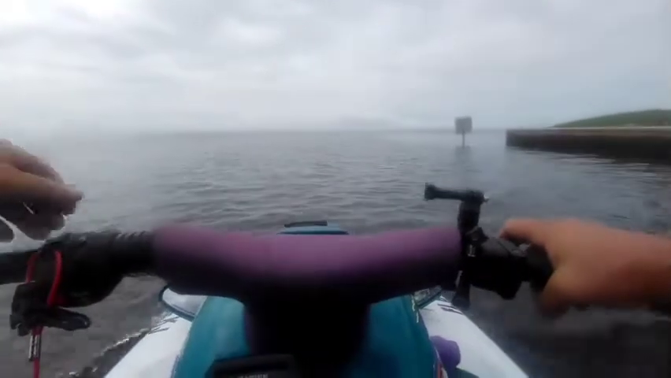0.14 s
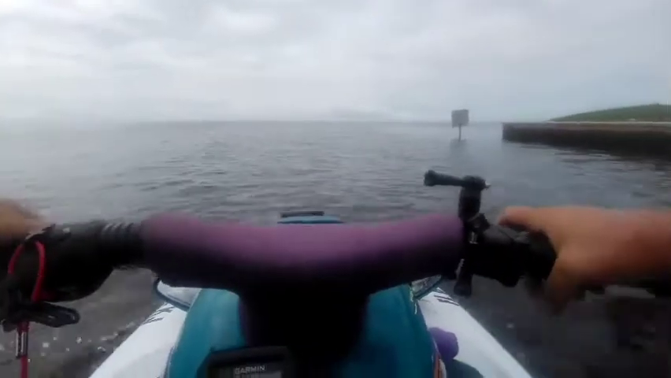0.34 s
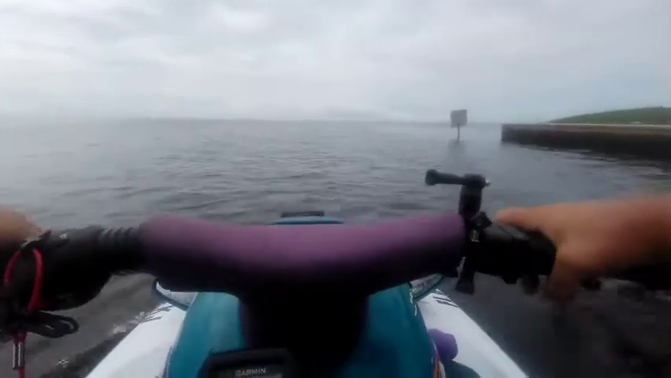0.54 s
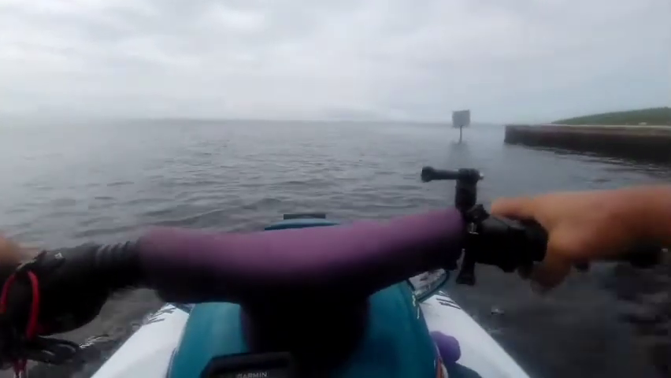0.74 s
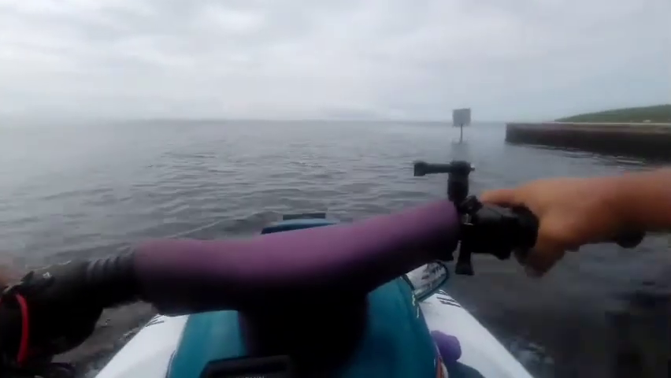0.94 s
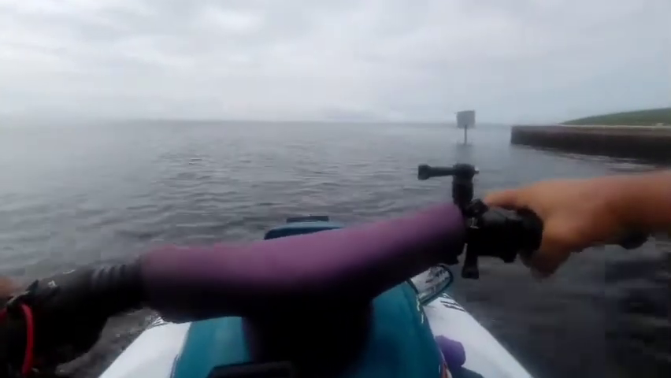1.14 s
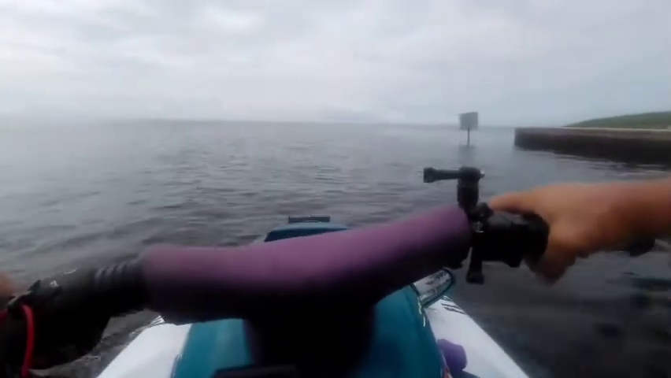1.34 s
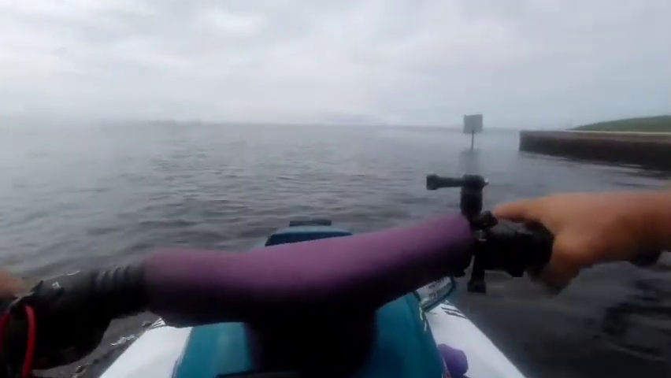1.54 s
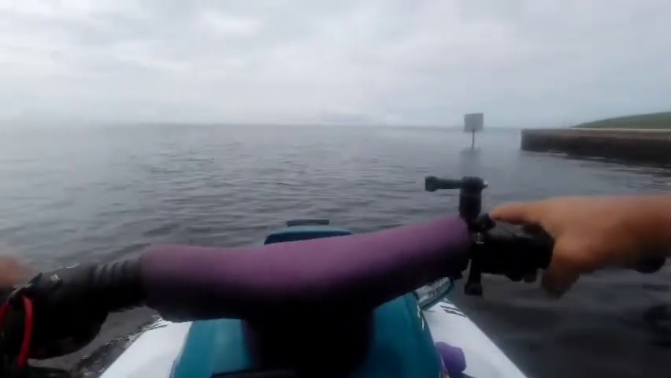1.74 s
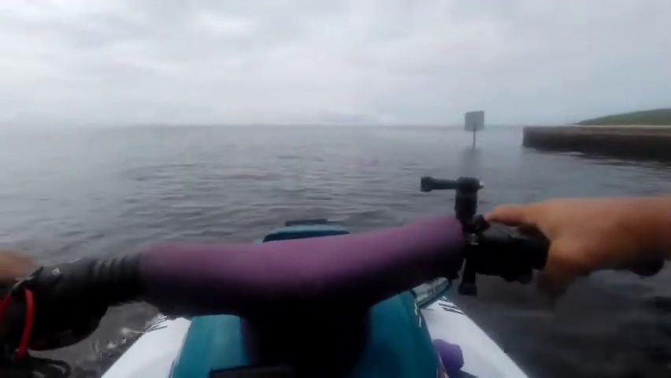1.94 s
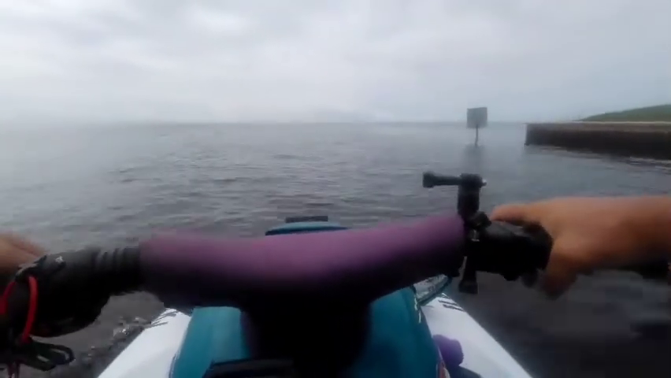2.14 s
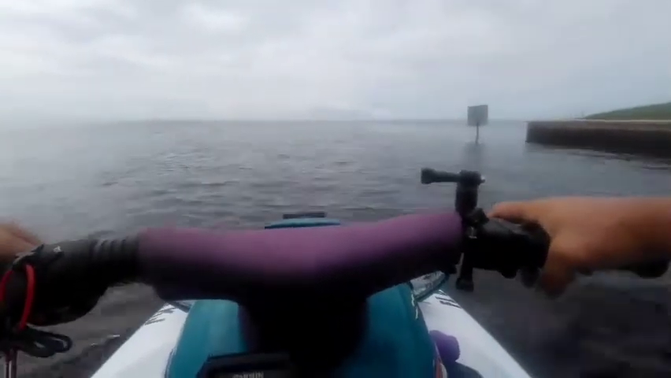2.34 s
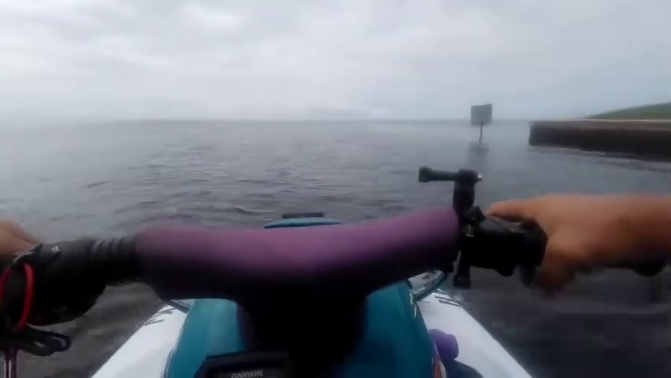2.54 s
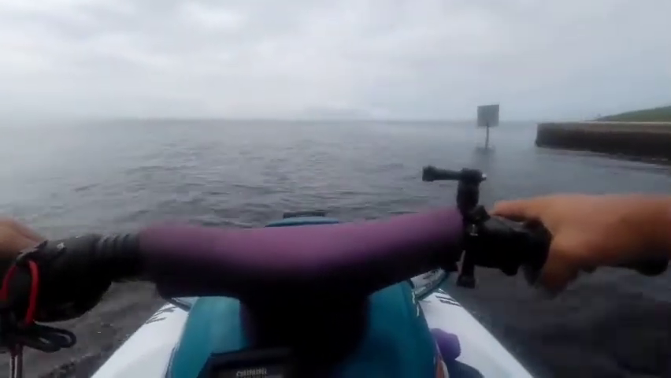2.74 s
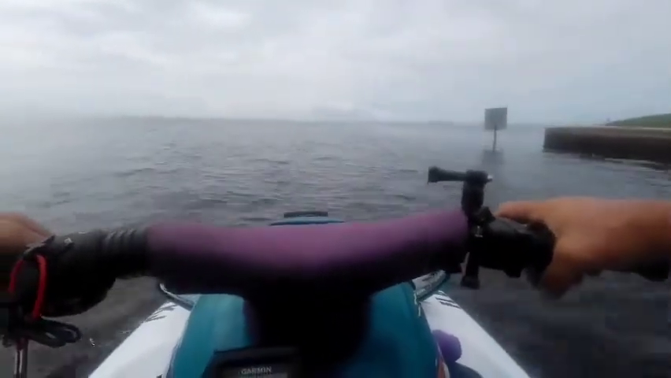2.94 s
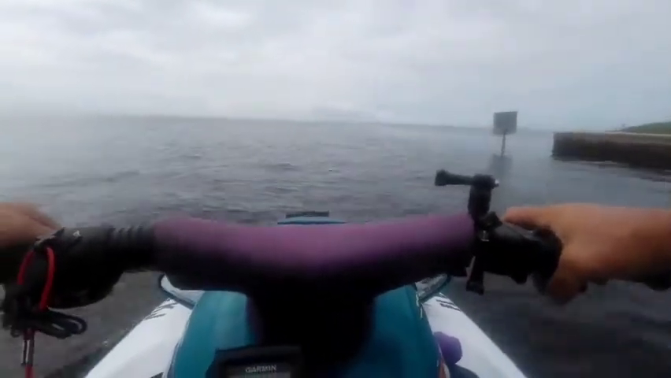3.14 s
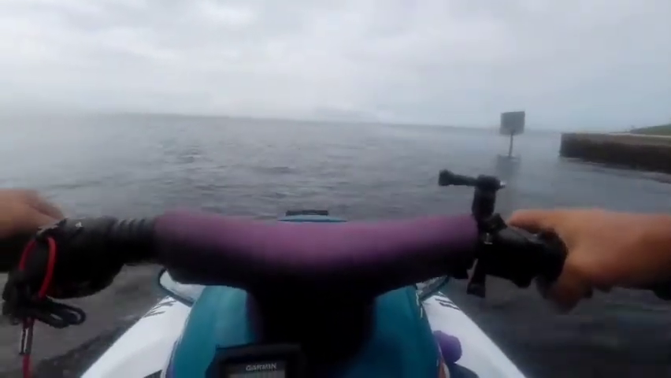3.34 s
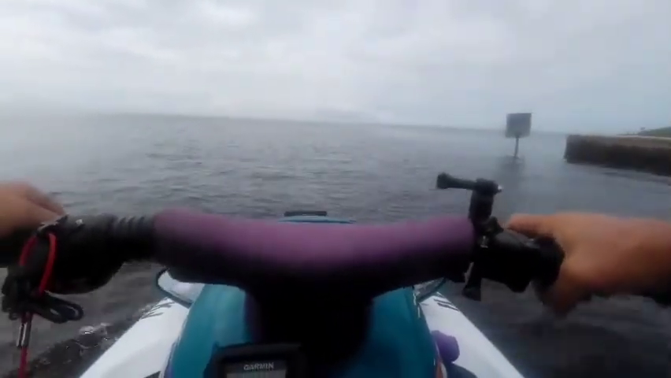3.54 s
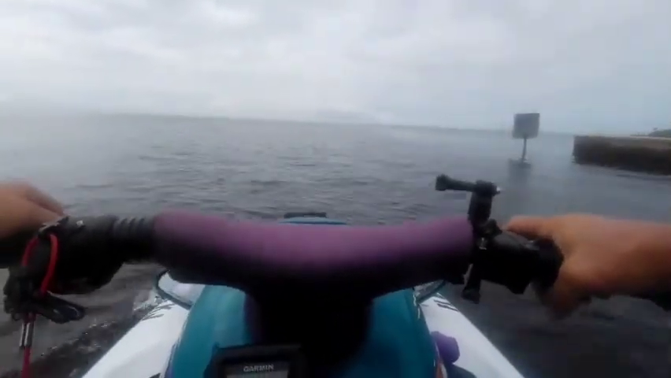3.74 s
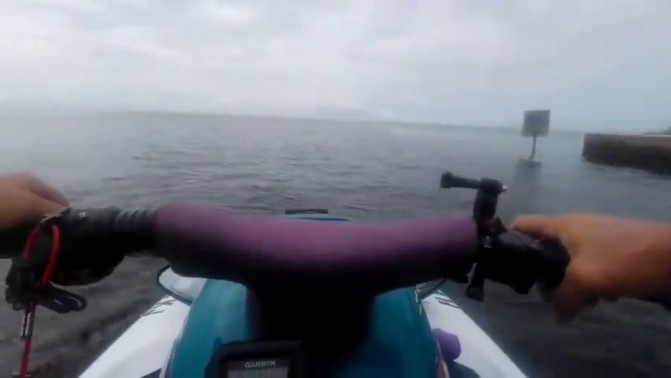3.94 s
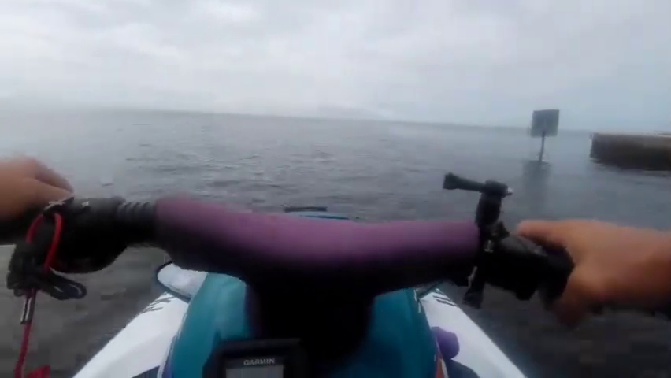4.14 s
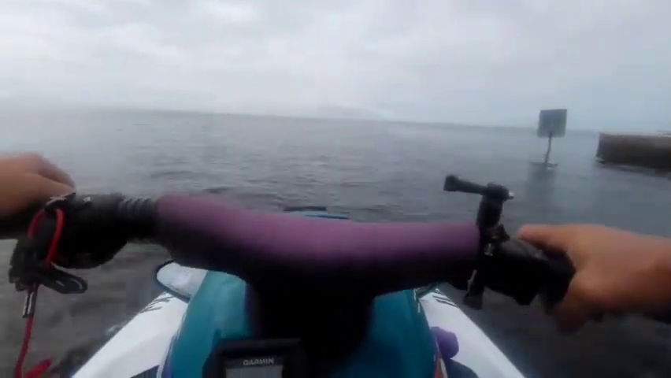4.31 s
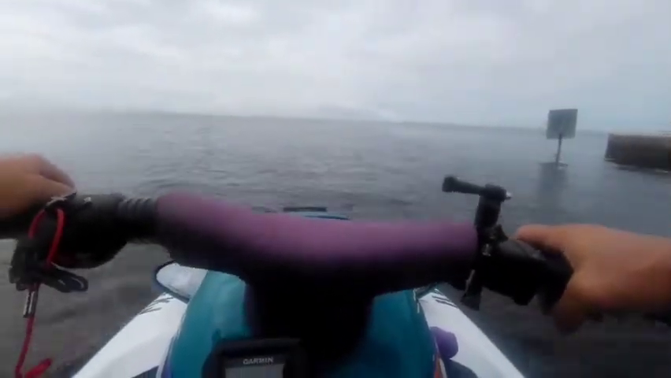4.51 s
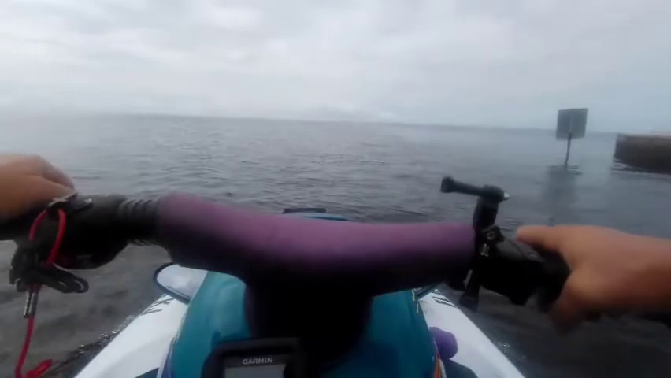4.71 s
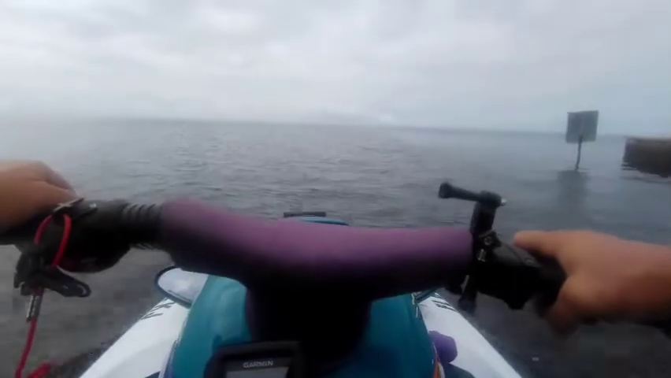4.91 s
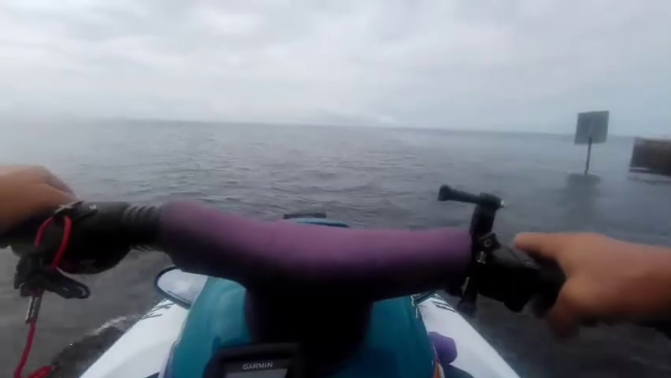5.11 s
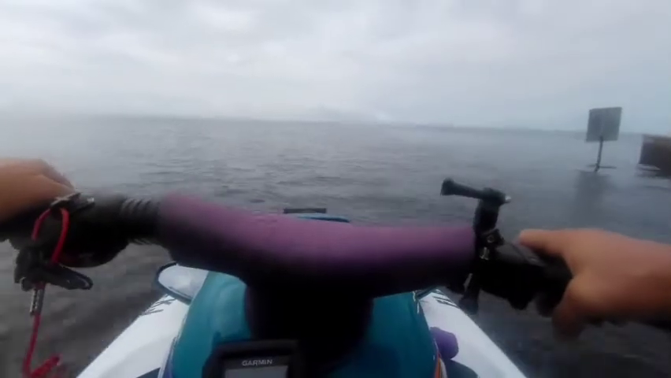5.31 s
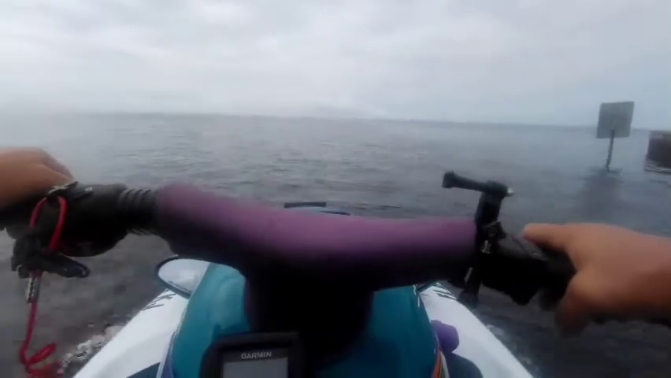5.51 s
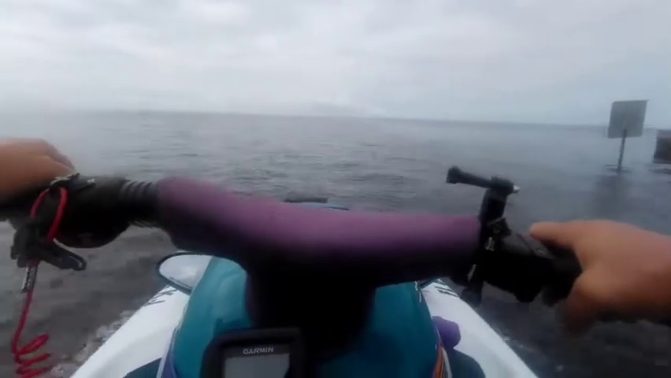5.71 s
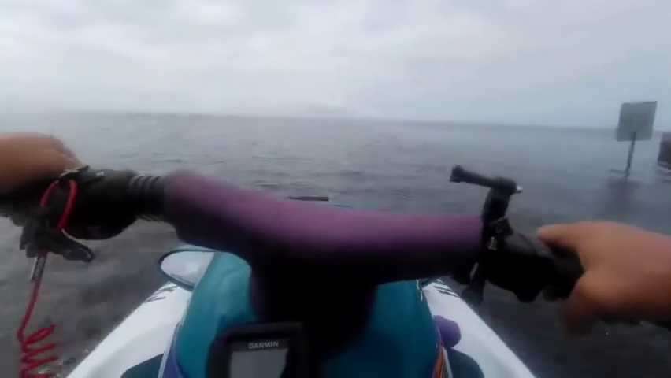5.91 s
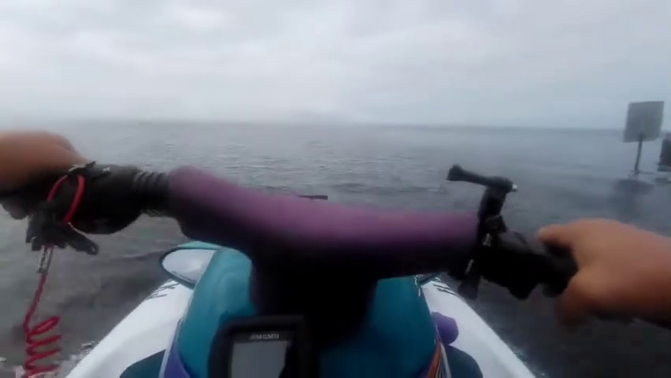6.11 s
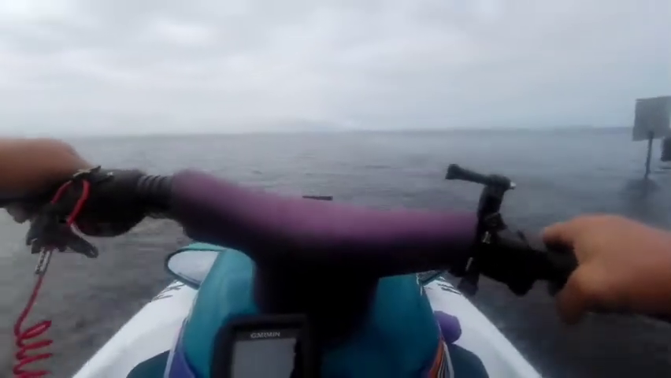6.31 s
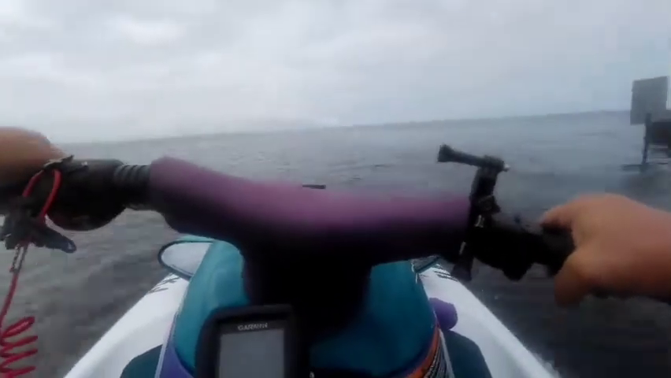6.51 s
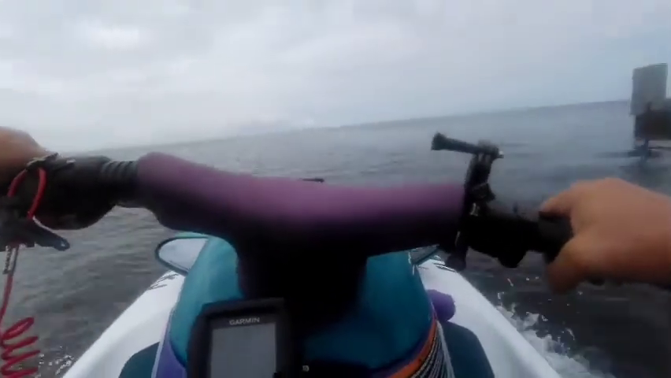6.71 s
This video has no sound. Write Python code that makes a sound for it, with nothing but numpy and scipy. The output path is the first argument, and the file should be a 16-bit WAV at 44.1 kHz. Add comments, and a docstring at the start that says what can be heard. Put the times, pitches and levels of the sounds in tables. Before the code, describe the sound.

Close on a jet ski from the rider's seat, outdoors on open water. The two-stroke engine idles low and uneven, muffled and burbling, with hollow hull thumps and faint water wash and slaps. After four seconds it quickens, then near six seconds jumps to a much louder, buzzing drone that keeps creeping upward.

```python
"""A twin-cylinder two-stroke jet ski, heard from the rider's seat: crank harmonics filtered by its exhaust pipe.
It idles lumpily, surging about ten times a second, then opens up in two steps to a drone that creeps upward.
Firing pulses boom in the hull, noise puffs rattle the casing and pulse the intake and pump hiss, and surges
ring a water box and buzz loose fittings. Low thumps sink in pitch, panels sing, thin whines swell, and water
washes, slaps and trickles."""
import sys
import numpy as np
from scipy import signal
from scipy.fft import rfft, irfft, next_fast_len
from scipy.io import wavfile
from scipy.ndimage import uniform_filter1d

SR = 44100
rng = np.random.default_rng(int(sys.argv[2]) if len(sys.argv) > 2 else 0)


def transcribe(signal):
    """Save signal, clipped to [-1, 1], as a 16-bit WAV file at the path in sys.argv[1]."""
    frames = np.atleast_2d(signal).T
    limited = np.clip(frames, -1, 1)
    pcm = np.round(limited * 32767).astype(np.int16)
    wavfile.write(sys.argv[1], SR, pcm)


N = 302431
TIME = np.arange(N) / SR  # seconds
SURGE_S = .019  # standard deviation of each surge's bell shape
WASH_DB = -51.5
TOP_HZ = 15400

# Crankshaft speed. Each row: time in seconds, turns per second in Hz.
CRANK_SPEED = [(0, 25.73), (1.5, 24.28), (3.5, 23.96), (4.1, 23.55), (4.35, 28.17), (4.5, 29.55),
               (4.8, 36.24), (5.1, 40.1), (5.4, 41.24), (5.55, 43), (5.708, 49.3), (5.788, 54.1),
               (5.896, 60.4), (5.98, 69.27), (6.09, 82.83), (6.3, 83.8), (6.494, 85.23), (6.6, 88.1),
               (6.694, 88.4), (6.86, 92.1)]
# Surges of firing at low speed. Each row: centre in seconds, drive of the low water-box mode in dB,
# drive of the high mode in dB, swing of the engine's level in dB.
SURGES = [(0.019, -42, -44, 4), (0.055, -52, -56, 5), (0.147, -47, -51, 1), (0.211, -58, -54.5, -0.5),
          (0.274, -49, -56, 0.5), (0.388, -53, -47, 5.5), (0.51, -51.5, -52, 3.5), (0.554, -55, -57, 1),
          (0.65, -45, -50.5, 7), (0.8, -40, -53, 7), (0.955, -53, -54, 5.5), (1.034, -46, -48, 7),
          (1.066, -44, -55, 1.5), (1.165, -47, -52, -0.5), (1.241, -61, -55, 1), (1.3, -53, -51.5, -1.5),
          (1.412, -47, -53.5, 5), (1.51, -55, -56, 5), (1.562, -59, -55, 1.5), (1.651, -46, -51.5, 0.5),
          (1.79, -49, -69, 1.5), (1.911, -58, -52, 0), (2.021, -50, -52, -1.5), (2.088, -60, -51, -2),
          (2.183, -39.5, -47, 8), (2.348, -62, -50.5, 7), (2.469, -48, -57, 2), (2.587, -42.5, -51, 0),
          (2.724, -41, -49, 3.5), (2.832, -58, -58.5, 3), (2.991, -58, -68, 3.5), (3.123, -43, -51.5, -2),
          (3.295, -54, -50, 3.5), (3.356, -46, -50.5, 0), (3.474, -47, -52, 5.5), (3.608, -51, -53, 3.5),
          (3.764, -50, -53, -3.5), (3.85, -57, -47, 3.5), (3.991, -42, -46.5, 6.5), (4.149, -48, -53, 5),
          (4.311, -42.5, -45.5, 5), (4.448, -45, -46.5, 7), (4.557, -53, -52, 5.5),
          (4.638, -42, -46.5, 6.5), (4.739, -35, -44, 7.5), (4.813, -36.5, -43.5, 10),
          (4.906, -35, -44, 6.5), (4.968, -42, -44.5, 8), (5.059, -38, -42, 3), (5.159, -48, -48.5, 1),
          (5.21, -55, -45, -1), (5.257, -38, -47, -0.5), (5.31, -39, -48.5, -2), (5.359, -42, -44, 1),
          (5.451, -48, -45.5, 4.5), (5.593, -41, -49.5, -3.5)]
# Share of the surge swing heard in boom, clatter, hiss and upper exhaust harmonics, in that order [ratio].
SURGE_SHARE = (0.39, 0.62, 0.61, 0.63)
# Gain of each engine part against crank speed. Each row: speed in Hz, then in dB the hull boom, casing clatter,
# singing panels, hiss, once-a-turn note, firing note, its overtones, half-order growl.
LOUDNESS = [(26.1, -56.5, -65.5, -96.5, -79, -71, -52.5, -68.5, -67.5),
            (30.3, -48.5, -62.5, -77, -76.5, -54, -55, -63.5, -63),
            (37.8, -51, -61, -74, -74.5, -56, -49, -58.5, -60.5),
            (41, -55.5, -57, -71.5, -73.5, -56, -50.5, -55, -56),
            (42.6, -51.5, -58.5, -62.5, -71.5, -57, -67, -56, -58),
            (51.6, -53.5, -51.5, -55.5, -70.5, -47, -48.5, -49.5, -62),
            (65.5, -52, -51.5, -54.5, -62.5, -46, -34, -41, -61),
            (73.4, -52, -47, -53.5, -60, -43.5, -37.5, -41.5, -63),
            (83.9, -49, -47.5, -48.5, -57, -36, -43.5, -40.5, -50),
            (89.94, -44.5, -46.5, -43.5, -53.5, -39.5, -42, -37.5, -60.5)]
# Exhaust pipe response. Each row: frequency in Hz, gain in dB.
PIPE = [(25, -3), (84, -0.5), (125, -5), (142, -4), (166, 0), (183, 4), (200, -4), (219, 7), (238, -1.5),
        (258, -3.5), (290, -5), (315, -11.5), (342, -8), (365, -8.5), (415, -3.5), (465, -7), (505, -20),
        (600, -26.5), (1000, -48)]
# Hull cavity response. Each row: frequency in Hz, gain in dB.
HULL = [(30, -25), (60, 4), (100, 0.5), (130, -2), (155, -4.5), (185, 1.5), (225, -12), (270, -3), (300, 0),
        (325, -4.5), (395, -0.5), (480, -16.5), (800, -57.5), (2500, -84)]
# Engine casing resonances. Each row: frequency in Hz, width in Hz, gain in dB.
CASING = [(763, 325, -4), (1027, 76, -6.5), (1185, 89, 1), (1297, 56, 3.5), (1557, 53, -6),
          (1886, 63, -7.5), (2016, 60, -2), (2142, 55, 1.5), (2810, 128, -11)]
# Broad hiss of intake and jet pump. Each row: frequency in Hz, gain in dB.
HISS = [(500, -2), (1500, 6.5), (2400, -4), (2850, 1), (3300, 2), (3650, 3.5), (4250, -3), (4550, -21),
        (4850, -5), (5250, -5), (5650, -31), (6200, -14), (7200, -29), (9000, -32.5), (10000, -52.5),
        (14000, -45)]
# Wash of open water. Each row: frequency in Hz, gain in dB.
WASH = [(15, -5), (25, -3.5), (45, -14), (100, -12.5), (300, -17.5), (600, -39), (1500, -39), (3000, -48),
        (5000, -56), (7000, -58), (10000, -65), (15000, -70)]
# Exhaust water-box modes, low then high. Each row: frequency in Hz, length in seconds, gain in dB.
WATER_BOX = [(217.3, 0.021, -7.5), (389.4, 0.013, -1)]
# Resonances of the loose fittings. Each row: frequency in Hz, width in Hz, gain in dB.
FITTINGS = [(572, 160, 2.5), (1205, 290, -1), (1930, 130, 5)]
# Low thumps in the idle and early rev, each sinking in pitch. Each row: start in seconds,
# starting pitch in Hz, level in dB.
THUMPS = [(0.132, 125, -52), (0.401, 277, -43.5), (0.772, 125, -49), (0.88, 110, -52), (1.089, 119, -46),
          (1.241, 285, -46), (1.426, 258, -44), (1.515, 250, -48.5), (1.533, 122, -37.5),
          (1.764, 121, -39.5), (1.768, 250, -48.5), (2.633, 117, -41), (2.816, 290, -47), (2.909, 248, -51),
          (3.034, 258, -45), (3.074, 114, -46), (3.228, 252, -48), (3.963, 310, -43), (4.2, 268, -42),
          (4.361, 120, -42), (4.674, 240, -41.5), (5.104, 298, -39.5), (5.644, 266, -37)]
# Waves slapping the hull. Each row: centre in seconds, pitch in Hz, level in dB, length in seconds.
SLAPS = [(0.559, 111, -45, 0.014), (1.064, 52, -40, 0.01), (1.197, 52, -42, 0.01), (1.394, 47, -37, 0.015),
         (1.557, 51, -39.5, 0.022), (2.498, 40, -49, 0.04), (2.857, 39, -44, 0.017),
         (2.913, 86.6, -43, 0.014), (3, 41.6, -45, 0.021), (3.748, 41.4, -42.5, 0.024),
         (3.941, 39.8, -43, 0.016), (4.57, 41, -43.5, 0.02), (5.923, 33.6, -46, 0.029),
         (6.614, 22, -35, 0.04)]
# Panel modes that sing when a crank harmonic reaches them. Each row: frequency in Hz, width in Hz, gain in dB.
PANELS = [(761, 19, -8), (1007, 45, 5.5), (1180, 40, -0.5), (1253, 72, -5.5), (2118, 98, -7)]
# Thin wavering whines. Each row: peak in seconds, pitch there in Hz, level in dB, rise in seconds,
# fall in seconds, waver in Hz.
WHINES = [(5.4, 1203, -65.5, 0.18, .3, 8.9), (6.03, 1235, -56.5, 0.035, 0.07, 6.6),
          (6.499, 2160, -51, 0.18, 0.1686, 4.25), (6.65, 2041, -50, 0.07, 0.11, 3.74)]


def undb(db):
    """Convert decibels to amplitude gain."""
    return 10 ** (np.asarray(db) / 20)


def unit(x):
    """Normalise to a root-mean-square of one."""
    return x / np.sqrt(np.mean(x ** 2))


def steady(x):
    """Normalise by the running half-second power, leaving faster beats intact."""
    return x / np.sqrt(uniform_filter1d(x ** 2, SR // 2) + 1e-18)


def swell(centre_s, length_s):
    """Gaussian envelope about one moment; the length is its standard deviation."""
    return np.exp(-.5 * np.minimum(((TIME - centre_s) / length_s) ** 2, 10 ** 2))


def noise():
    """White noise: equal power at all frequencies."""
    return rng.standard_normal(N)


def walk(rate_hz):
    """Smoothed random steps, a slow fluctuation of unit rms."""
    hold = max(int(SR / rate_hz), 2)
    steps = np.repeat(rng.standard_normal(N // hold + 1), hold)
    smooth = uniform_filter1d(uniform_filter1d(steps, hold), hold // 2)
    return unit(smooth[:N])


def minimum_phase(x, gain_at):
    """Causal filtering: the folded cepstrum gives the minimum-phase response of a given gain curve."""
    size = 2 * next_fast_len(N // 2 + SR // 2)
    hz = np.maximum(np.arange(size // 2 + 1) * SR / size, 1)
    cepstrum = irfft(np.log(gain_at(hz) + 1e-9))
    cepstrum[1:size // 2] *= 2
    cepstrum[size // 2 + 1:] = 0
    response = np.exp(rfft(cepstrum))
    return irfft(rfft(x, size) * response)[:N]


def colour(x, points):
    """Spectral shaping: gain in dB runs straight between points in log frequency."""
    hz, db = np.transpose(points)
    return minimum_phase(x, lambda f: undb(np.interp(np.log(f), np.log(hz), db)))


def resonate(x, modes):
    """Modal resonance: the gains of steep-sided peaks add."""
    def gain_at(f):
        total = 0
        for hz, width, db in modes:
            detuning = (f * f - hz * hz) / (f * width * 2)
            total = total + undb(db) / (1 + detuning ** 2 * 2)
        return total
    return minimum_phase(x, gain_at)


def throb(centre_s, hz, db, length_s, glide_hz_per_s=0):
    """A short tone burst: a linearly gliding sine under a Gaussian envelope."""
    near = np.abs(TIME - centre_s) < 4 * length_s
    age = TIME[near] - centre_s
    cycles = hz * age + .5 * glide_hz_per_s * age ** 2 + rng.random()
    out = np.zeros(N)
    out[near] = undb(db) * np.exp(-.5 * (age / length_s) ** 2) * np.sin(2 * np.pi * cycles)
    return out


def firings(turns, load, idle_scatter_db, load_scatter_db, alternate_db, jitter, puff_turns):
    """Impulsive combustion: two uneven pulses a turn, each with a gas puff decaying in crank angle."""
    count = int(2 * turns[-1])
    chance = rng.standard_normal((count, 2))
    number = np.arange(count)
    # jitter is in firing intervals
    firing_turn = (number + .5 + jitter * chance[:, 0]) / 2
    at = np.sort(np.interp(firing_turn, turns, np.arange(N))).astype(int)
    scatter_db = idle_scatter_db + (load_scatter_db - idle_scatter_db) * load[at]
    strength = undb(scatter_db * chance[:, 1] + alternate_db * (number % 2))
    last = np.maximum(np.searchsorted(at, np.arange(N), side="right") - 1, 0)
    puff = strength[last] * np.exp(-np.abs(turns - turns[at[last]]) / puff_turns)
    return np.bincount(at, strength, N), puff


def surge_swing():
    """Slow amplitude modulation in dB as the engine catches and misses, less its half-second mean."""
    swing = sum(db * swell(s, SURGE_S) for s, _, _, db in SURGES)
    return swing - uniform_filter1d(swing, SR // 2)


def loudness(crank_hz):
    """Source strength against speed: the gain of each engine part, interpolated in dB."""
    hz, *columns = np.transpose(LOUDNESS)
    return [undb(np.interp(crank_hz, hz, db)) for db in columns]


def exhaust(turns, crank_hz, load, gains, chug_db):
    """Source and filter: crank harmonics sweep a pipe response; odd and half orders come from uneven firing."""
    turn_gain, firing_gain, overtone_gain, growl_gain = gains
    odd_fall_db, growl_fall_db = 5.5, 2.5  # per octave
    wobble_db, rough_db = 2.1, 1.84
    waver_turns, growl_waver_turns = 0.051, .13
    pipe_hz, pipe_db = np.transpose(PIPE)
    out = 0
    for order in np.arange(1, 12.5, .5):
        wander = waver_turns * np.sqrt(order) * (1 - 0.67 * np.sqrt(load))
        if order % 1:
            gain = growl_gain * undb(-growl_fall_db * np.log2(order / 2))
            wander = growl_waver_turns
        elif order % 2:
            gain = turn_gain * undb(-odd_fall_db * np.log2(order))
        else:
            gain = firing_gain if order == 2 else overtone_gain
        response_db = np.interp(np.log(order * crank_hz), np.log(pipe_hz), pipe_db)
        # orders above the firing note chug and flutter; those up to it stay firmer
        if order > 2:
            flutter_db = chug_db + wobble_db * walk(14) + rough_db * walk(70)
        else:
            flutter_db = .5 * rough_db * walk(60)
        # even orders start in step with the firings
        offset = rng.random() if order % 2 else -order / 4
        phase = 2 * np.pi * (order * turns + offset + wander * walk(14))
        out = out + np.sqrt(2) * np.sin(phase) * gain * undb(response_db + flutter_db)
    return out


def hull(turns, load):
    """Cavity resonance: firing pulses and gas noise boom in the hollow hull, more evenly under load."""
    pulses, puff = firings(turns, load, idle_scatter_db=2.0, load_scatter_db=0.5,
                           alternate_db=1.0, jitter=0.019, puff_turns=.45)
    gas = steady(puff * noise())
    return steady(colour(steady(pulses) + undb(-2.5) * gas, HULL))


def casing(turns, load):
    """Structural modes: each firing knocks the casing, and a decaying noise rattle follows it."""
    pulses, puff = firings(turns, load, idle_scatter_db=1.24, load_scatter_db=0.3,
                           alternate_db=-0.5, jitter=.05, puff_turns=1.8)
    rattle = steady(puff * noise())
    return steady(resonate(rattle + undb(-15) * steady(pulses), CASING))


def intake_and_pump(turns, load):
    """Turbulent flow noise: broadband hiss, amplitude-modulated by the firings over a smooth part."""
    _, puff = firings(turns, load, idle_scatter_db=4.5, load_scatter_db=2.5,
                      alternate_db=-4.5, jitter=0.037, puff_turns=0.81)
    smooth = 0.88
    return steady(colour((smooth + puff) * noise(), HISS))


def wash():
    """Broadband radiation of moving water: shaped noise whose level drifts slowly."""
    return unit(colour(noise(), WASH)) * undb(WASH_DB + 1.2 * walk(2.88))


def water_box():
    """Impulse excitation of cavity modes: each surge rings two modes, which glide upward."""
    scatter_hz, rise_per_s = 9, 1.5  # rise as a fraction of the mode frequency
    chances = rng.standard_normal((len(SURGES), len(WATER_BOX)))
    out = 0
    for (s, *drives_db, _), chance in zip(SURGES, chances):
        for (hz, length_s, mode_db), db, detune in zip(WATER_BOX, drives_db, chance):
            out = out + throb(s, hz + scatter_hz * detune, db + mode_db, length_s, rise_per_s * hz)
    return out


def fittings(turns, load):
    """Forced vibration: surges shake loose fittings, a buzz renewed at each firing, each decay cut short by the
    next."""
    shake = sum(undb(db) * swell(s, SURGE_S) for s, _, _, db in SURGES)
    _, puff = firings(turns, load, idle_scatter_db=1.8, load_scatter_db=3.0,
                      alternate_db=-0.5, jitter=0.057, puff_turns=1.0)
    buzz = unit(resonate(puff * noise(), FITTINGS))
    return buzz * shake * undb(-71.0)


def thumps():
    """Transient response: a low thump rises fast and dies as its pitch sinks."""
    attack_s, decay_s = 0.0018, 0.014
    sag, sag_s = 0.29, 0.033  # fraction of pitch lost, and its time constant
    out = 0
    for (s, hz, db), start in zip(THUMPS, rng.random(len(THUMPS))):
        age = np.clip(TIME - s, 0, 1)
        cycles = hz * ((1 - sag) * age + sag * sag_s * (1 - np.exp(-age / sag_s)))
        envelope = (1 - np.exp(-(age / attack_s) ** 2)) * np.exp(-age / decay_s)
        out = out + undb(db) * envelope * np.sin(2 * np.pi * (cycles + start))
    return out


def slaps():
    """Impact of waves on a hollow body: short, mostly low tone bursts."""
    return sum(throb(s, hz, db, length_s) for s, hz, db, length_s in SLAPS)


def tap():
    """Damped free vibration: a short knock rings one hull panel, with a noise crack on top."""
    at_s, decay_s, ring_hz = 1.505, 0.0045, 1300
    crack = unit(resonate(noise(), [(1500, 900, 0)]))
    age = np.maximum(TIME - at_s, 0)
    knock = np.sin(2 * np.pi * ring_hz * age) + undb(-7) * crack
    return undb(-47.5) * (age > 0) * np.exp(-age / decay_s) * knock


def trickle():
    """Bubble resonance: one brief swell of narrow-band noise, read at a varying rate to wander in pitch."""
    peak_s, rise_s, fall_s = 2.44, 0.22, 0.2
    bubbles = unit(resonate(noise(), [(1535, 100, 0)]))
    position = np.cumsum(1 + 0.014 * walk(12))
    bubbles = np.interp(position, np.arange(N), bubbles)
    return bubbles * undb(-66.5) * swell(peak_s, np.where(TIME < peak_s, rise_s, fall_s))


def singing_panels(turns):
    """Sympathetic resonance: knocks repeat every turn, and their harmonics light up panel modes in passing."""
    even_db, flutter_db, slip_turns = -7, 1.1, 0.0016
    angle = 2 * np.pi * (turns + slip_turns * walk(30))
    knocks = 0
    for order in range(8, 33):
        level_db = even_db * (1 - order % 2) + flutter_db * walk(30)
        knocks = knocks + undb(level_db) * np.sin(order * angle + 2 * np.pi * rng.random())
    return steady(resonate(knocks, PANELS))


def whines():
    """Frequency-modulated tones: thin whines swell and fade, a little flat while they are weak."""
    sag_hz = 30
    out = 0
    for s, hz, db, rise_s, fall_s, waver_hz in WHINES:
        strength = swell(s, np.where(TIME < s, rise_s, fall_s))
        pitch_hz = hz - sag_hz * (1 - strength) + waver_hz * walk(140)
        phase = 2 * np.pi * np.cumsum(pitch_hz) / SR
        out = out + np.sqrt(2) * np.sin(phase) * strength * undb(db + 0.5 * walk(32))
    return out


def scene():
    """Common excitation: crank speed sets firing rate and part levels, and load steadies the exhaust and hull."""
    crank_hz = np.interp(TIME, *np.transpose(CRANK_SPEED))
    turns = np.cumsum(crank_hz) / SR
    load = np.clip((crank_hz - 28) / 55, 0, 1)
    boom_gain, clatter_gain, panel_gain, hiss_gain, *exhaust_gains = loudness(crank_hz)
    boom_db, clatter_db, hiss_db, chug_db = np.outer(SURGE_SHARE, surge_swing())
    note = exhaust(turns, crank_hz, load, exhaust_gains, chug_db) + water_box()
    boom = hull(turns, load) * boom_gain * undb(boom_db) + thumps()
    clatter = casing(turns, load) * clatter_gain * undb(clatter_db) + fittings(turns, load)
    hiss = intake_and_pump(turns, load) * hiss_gain * undb(hiss_db)
    water = wash() + slaps() + trickle()
    panels = singing_panels(turns) * panel_gain
    return (note + boom + clatter + hiss + water + tap() + panels + whines())[None]


def record(dry):
    """Band limiting: a steep elliptic low-pass removes the extreme treble."""
    return signal.sosfilt(signal.ellip(8, .2, 70, TOP_HZ, fs=SR, output="sos"), dry)


dry = scene()
out = record(dry)
transcribe(out)
```